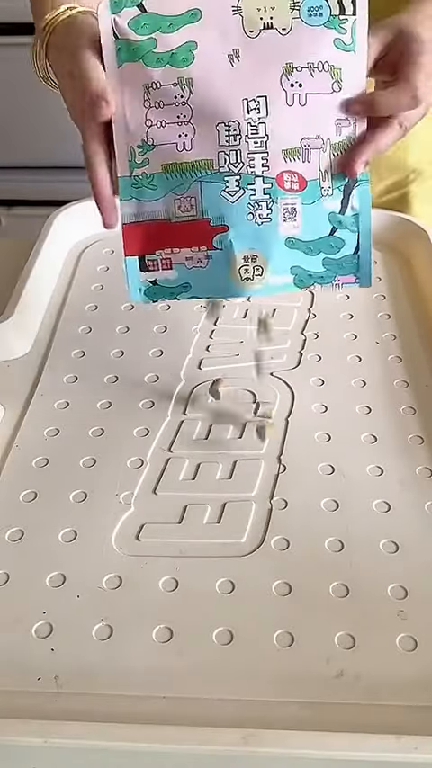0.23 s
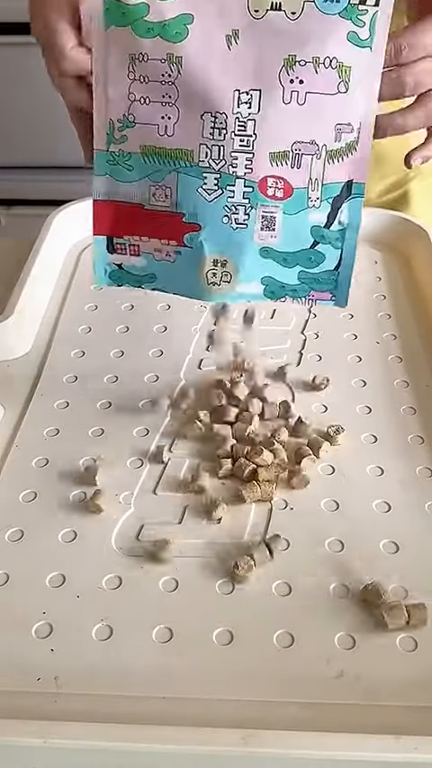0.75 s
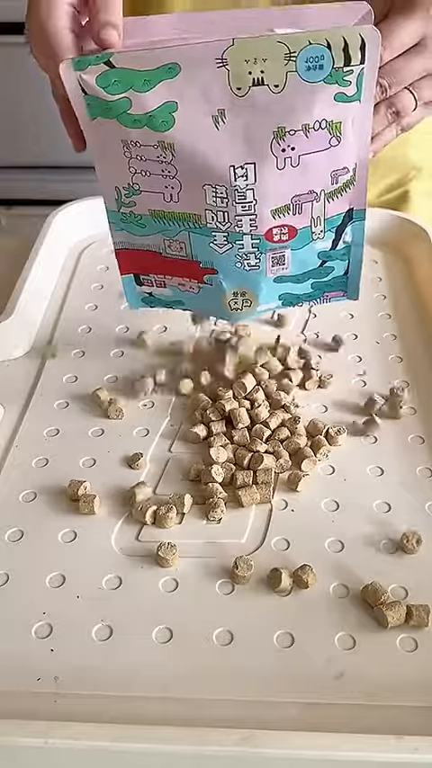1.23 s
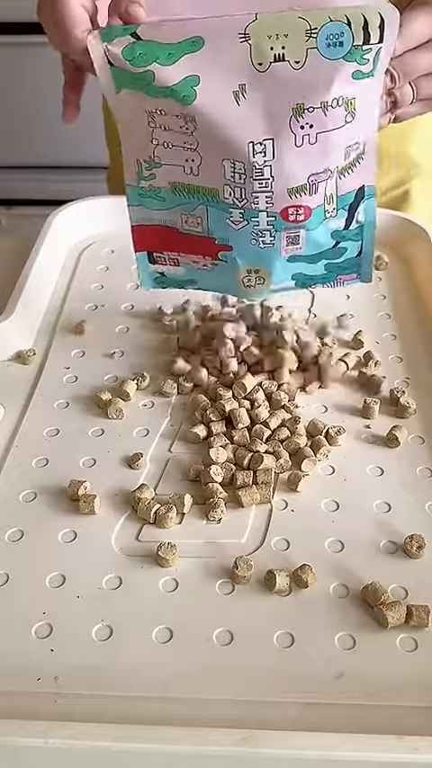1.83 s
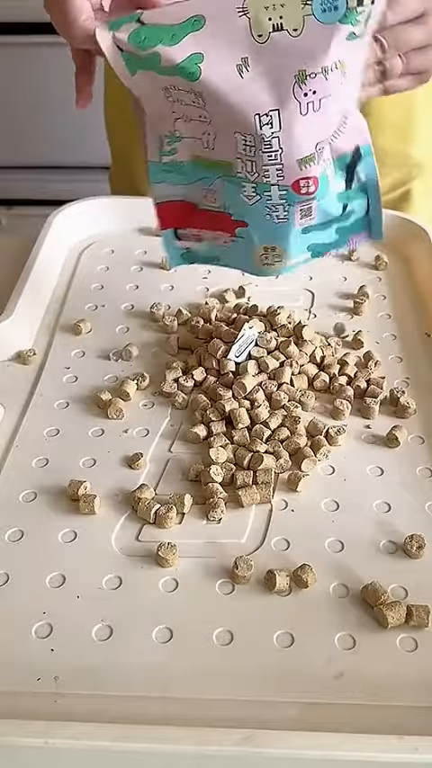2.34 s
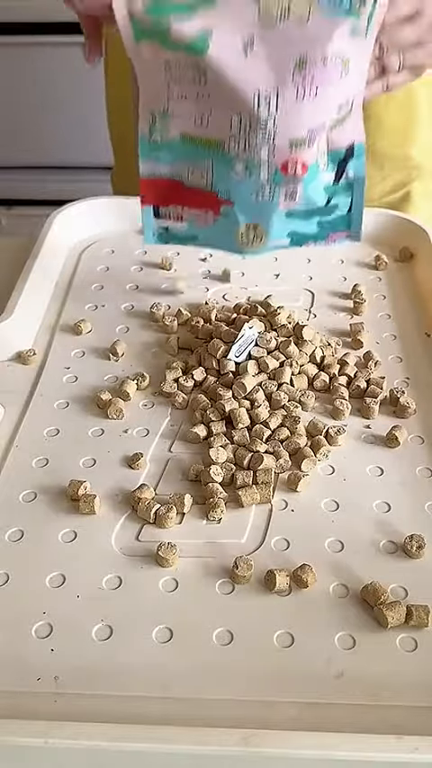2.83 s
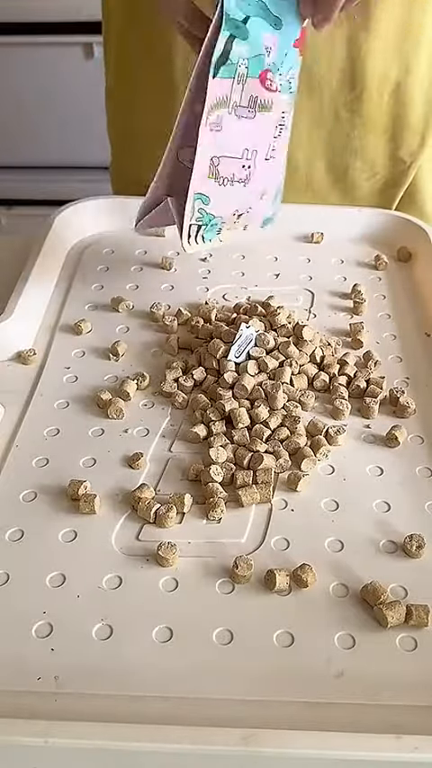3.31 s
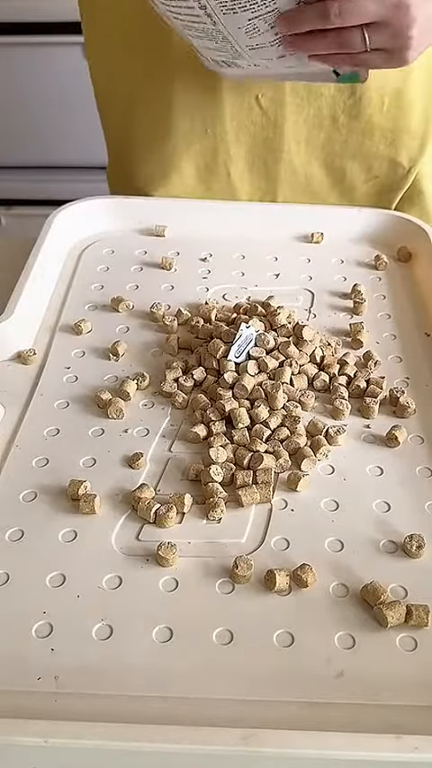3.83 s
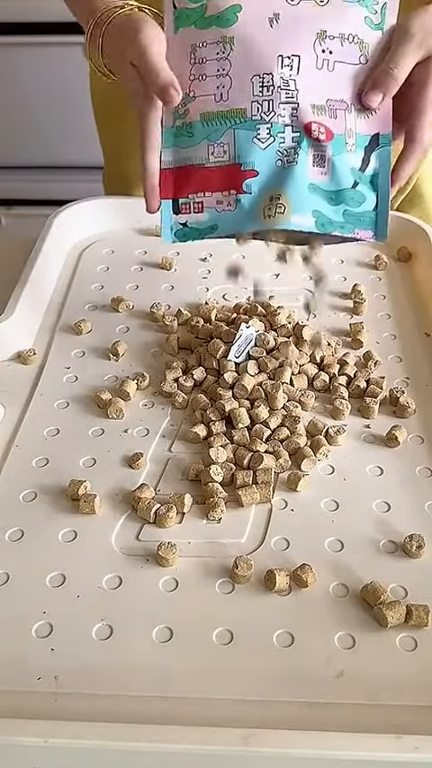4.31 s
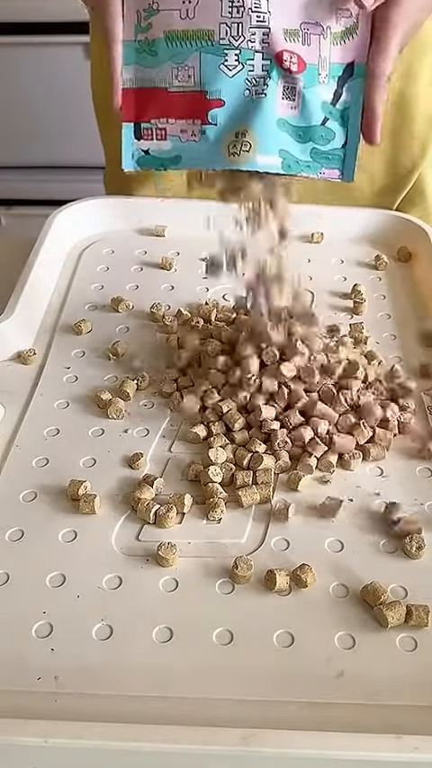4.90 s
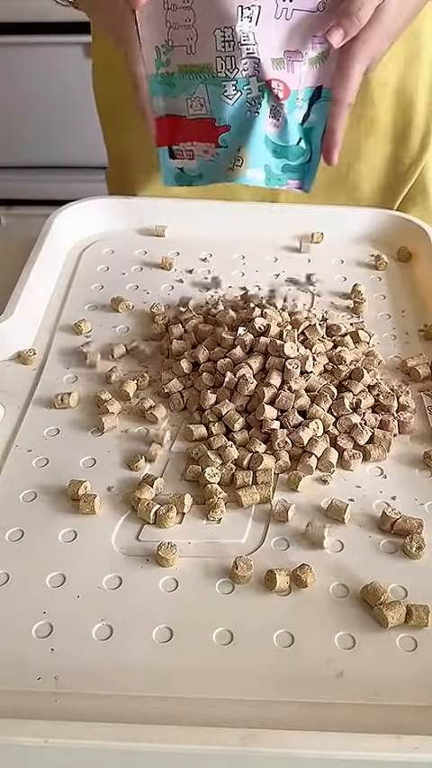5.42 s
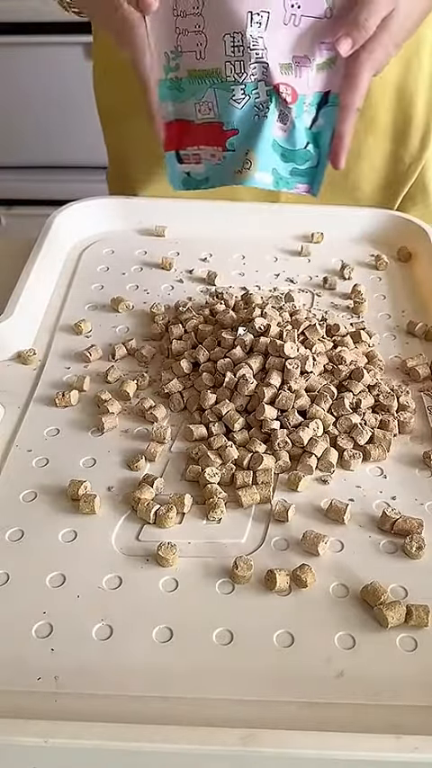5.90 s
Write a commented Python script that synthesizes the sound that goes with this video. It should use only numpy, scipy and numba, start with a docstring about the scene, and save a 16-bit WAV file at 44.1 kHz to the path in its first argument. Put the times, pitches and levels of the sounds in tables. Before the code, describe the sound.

Dry pellets clatter from a stiff plastic pouch onto a hollow plastic tray, with sharp film crackles, then a second pour and pouch shaking, close up indoors.

```python
"""Small hard room, indoors: dry pellets are shaken from stiff plastic pouches onto a hollow plastic tray, close by.
Hard landings are short pitched swings that push the tray's modes; random clicks patter on the heap.
Pouch film snaps in gritty bursts, rustles as filtered grains and thuds as its walls flex.
Decaying noise makes the room's answer; a faint rush and a low rumble are shaped noise.
Twice the sound drops briefly to near silence."""
import sys
import numpy as np
from scipy import signal
from scipy.fft import rfft, irfft
from scipy.io import wavfile
from scipy.ndimage import uniform_filter1d
from numba import njit

SR = 44100
rng = np.random.default_rng(int(sys.argv[2]) if len(sys.argv) > 2 else 0)


def int16_out(signal):
    """Quantize to a 16-bit WAV file."""
    q = np.round(np.clip(np.atleast_2d(signal).T, -1, 1) * 32767)
    wavfile.write(sys.argv[1], SR, q.astype(np.int16))


def ratio(d):
    """dB to gain"""
    e = np.asarray(d, float) / 20
    return 10 ** e


N = 271215
TIME = np.arange(N) / SR  # s

# All levels are relative, ahead of later gains.
# pellets landing hard: start_s [s], level_db [dB], pitch_hz [Hz]
LANDINGS = [(0.0132, -14, 1280), (0.0465, -6, 1500), (0.0516, -3, 1370), (0.0567, 1.5, 1207),
            (0.0817, -1, 1426), (0.0914, -1, 1300), (0.1076, -8.5, 1686), (0.1227, -12, 1390),
            (0.1863, -1.5, 1437), (0.1964, -9, 1450), (0.2201, -9.5, 1264), (0.2532, -2.5, 980),
            (0.2564, -7.5, 970), (0.2644, -10.5, 1040), (0.3118, -8, 852), (0.346, -5, 1400),
            (0.3526, -9.5, 1404), (0.3606, -2.5, 1224), (0.4073, -11, 1400), (0.4096, -3, 2900),
            (0.4156, -9.5, 1400), (0.431, -3, 1465), (0.5157, -3, 1297), (0.5205, -3.5, 1444),
            (0.531, -1, 1610), (0.5404, -10.5, 1740), (0.5552, -7.5, 1287), (0.5787, -2.5, 1303),
            (0.5914, -5.5, 880), (0.5955, 0, 1600), (0.716, -5, 1060), (0.723, -1, 1785),
            (0.902, -11, 1585), (0.996, -13, 1600), (1.2076, -8.5, 2150), (1.2195, -14, 2110),
            (1.284, -8, 1684), (1.42, -11, 1376), (1.4774, -11.5, 1790), (1.5692, 2, 1250),
            (1.6569, -16.5, 1070), (1.7622, -18.5, 1860), (1.8138, -8, 2380), (1.828, -12, 2750),
            (1.842, -11, 1870), (2.0658, -16, 1310), (2.3356, -18.5, 1720), (2.3891, -10, 1225),
            (2.4015, -10, 1320), (2.4577, -10, 1650), (2.4997, -16, 1460), (2.6698, -24.5, 1740),
            (2.913, -11, 480), (2.9698, -7, 1330), (2.9938, -11, 1174), (2.999, -8, 1390),
            (3.0118, 3, 2050), (3.0842, -7.5, 1680), (3.114, -16.5, 1150), (3.1237, 1.5, 1950),
            (3.146, -11, 1750), (3.209, -8, 970), (3.2773, -14, 1043), (3.3269, -6.5, 1230),
            (3.372, -3, 1600), (3.4096, -7, 1770), (3.4225, -7.5, 1410), (3.4294, -4, 1250),
            (3.5066, -3, 1755), (3.5236, -5.5, 1124), (3.5697, -9, 1114), (3.627, -12.5, 1280),
            (3.6411, -11.5, 1020), (3.6932, -1, 1290), (3.7042, 0, 1500), (3.7074, -3, 1200),
            (3.847, -10, 1930), (3.8569, -11, 736), (3.9362, -13, 676), (3.9791, -9.5, 2000),
            (4.0554, -10.5, 1850), (4.0802, -9, 764), (4.1286, -8, 850), (4.1457, -10.5, 1280),
            (4.221, -9.5, 870), (4.4143, -17, 980), (4.4792, -19.5, 956), (4.495, -16, 834),
            (4.5563, -9, 1130), (4.632, -12.5, 840), (4.6858, -15.5, 890), (5.1219, -19, 2115),
            (5.266, -23, 2000), (5.4281, -19, 1940), (5.531, -14, 1960), (5.5944, -15.5, 2380),
            (5.913, -13, 350), (5.9259, -5, 2070), (5.983, -15, 420), (5.996, -17, 1430),
            (6.038, -14.5, 1517), (6.0734, -8, 1395)]
# tray modes: mode_hz [Hz], gain_db [dB], t60_s [s]
TRAY_MODES = [(822, -5, 0.069), (1191, -9.5, 0.064), (1400, -4.5, 0.012), (1792, -0.5, 0.01),
              (2300, -5, 0.0097), (3200, 0, 0.006)]
# how freely the tray rings before the heap damps it: time_s [s], share [0-1]
TRAY_SHARE = [(.85, 0.53), (1.1, 0.28), (1.5, .35), (1.57, .65), (1.75, 0.35), (2.8, 0.15), (3.75, 0.15),
              (4.1, 0.35)]
# pouch creases snapping: start_s [s], level_db [dB], crease_body_vs_crisp_top_db [dB]
SNAPS = [(0.1227, -11, -2), (0.146, -30.5, -5.5), (0.1865, -24, 10), (0.2369, -27, 15.5),
         (0.2498, -22.5, 0.5), (0.381, -30, 8), (0.41, -24, 5), (0.5898, -18, 5.5), (0.6188, -18, -5),
         (0.8914, -26.5, 2), (0.9575, -27.5, -1), (0.9791, -28.5, 3.5), (1.1232, -12, -21.5),
         (1.1402, -17.5, -17), (1.2081, -20, 1.5), (1.2765, -16, -2), (1.2835, -17, -2), (1.433, -22, 2),
         (1.4775, -19.5, 3), (1.7245, -12, -15.5), (1.7367, -12.5, -20.5), (1.7588, -16.5, -3),
         (1.7885, -9, -4.5), (1.8135, -10, -12), (1.842, -17, -8.5), (1.8548, -8.5, -5), (2.0654, -18.5, 3),
         (2.331, -32.5, 5.5), (2.4043, -12, 1), (2.4231, -19, -17), (2.4596, -10.5, -7.5), (2.5014, -20, 5),
         (2.5075, -15, -8), (2.6719, -24.5, -3), (2.9228, -11, -7), (3.011, -20, 0), (3.321, -24.5, 2),
         (3.4181, -23.5, 1), (3.5709, -15, 0), (3.598, -19.5, 2), (3.7045, -28, 14), (3.9122, -30, 7.5),
         (4.0536, -21.5, 2.5), (4.0791, -11.5, -8), (4.1364, -26, 9.5), (4.2192, -7.5, -8.5),
         (4.2349, -20.5, 5.5), (4.2865, -7.5, -10.5), (4.3586, -10.5, -3), (4.412, -26.5, 9.5),
         (4.423, -8, -10), (4.477, -17.5, -0.5), (4.492, -9.5, -15), (4.555, -11, -1),
         (4.5669, -6.5, -10.5), (4.625, -10.5, -6), (4.6842, -20, 2), (4.698, -11, -17.5),
         (4.7979, -39.5, 13), (5.1211, -19.5, 0), (5.3679, -24, -9), (5.3752, -20.5, -5),
         (5.4163, -23.5, -4), (5.426, -10, -6.5), (5.5, -24, -6), (5.5237, -11, -6), (5.547, -11, -10.5),
         (5.5575, -10.5, -6), (5.5665, -18, -2), (5.58, -16, -3), (5.5875, -16, 4), (5.5941, -17, 6),
         (5.9112, -28, 5), (5.9262, -17, 4.5), (5.9925, -21, 0), (6.0345, -14, -7.5), (6.0405, -14, -20),
         (6.0719, -16, -23), (6.087, -15.5, -5)]
# film resonances, body: centre_hz [Hz], width_hz [Hz], gain_db [dB]
CREASE_BODY = [(2230, 760, 4.5), (3006, 1040, 3.5), (4040, 490, -5)]
# film resonances, top: centre_hz [Hz], width_hz [Hz], gain_db [dB]
CRISP_TOP = [(5640, 800, 0.41), (6270, 1560, -1.8), (7400, 2700, -7.3)]
# steady handling: time_s [s], pellet_flow_db [dB], pouch_grip_db [dB]
POURING = [(0, -20, -33), (0.26, -27, -29), (0.48, -29, -33), (0.7, -20, -29), (0.85, -28, -36),
           (0.934, -40, -36), (1.07, -40, -39), (1.33, -38, -36), (1.5, -48, -38), (1.96, -50, -47),
           (2.04, -45, -40), (2.15, -50, -52), (2.53, -68, -65), (2.77, -55, -47), (2.84, -28, -32),
           (3.036, -22, -35), (3.313, -21, -30), (3.479, -26, -38), (3.609, -21, -28), (3.802, -27, -43),
           (4.041, -31, -38), (4.195, -38, -38), (4.334, -52, -55), (4.78, -52, -47), (4.973, -57, -59),
           (5.13, -43, -44), (5.49, -50, -48), (5.77, -41, -47), (5.85, -60, -58), (6.15, -48, -41)]
# handfuls sliding out: peak_s [s], patter_db [dB], rise_20db_s [s], fade_20db_s [s]
SPILLS = [(.06, -14, .03, .17), (.11, -19, .02, .06), (.195, -18, .02, .1), (.255, -13, .06, .09),
          (.31, -20, .03, .07), (.36, -16, .04, .08), (.42, -18, .04, .09), (.525, -16, .02, .2),
          (.585, -17, .06, .1), (.715, -20, .1, .1), (.905, -25, .04, .08), (.985, -25, .06, .025),
          (1.195, -24, .06, .08), (1.42, -21, .17, .035), (1.5, -19, .05, .04), (1.578, -24, .01, .09),
          (2.975, -19, .1, .06), (3.0, -17, .04, .07), (3.33, -19, .2, .2), (3.42, -20, .05, .06),
          (3.61, -16, .05, .3), (3.861, -21, .04, .06), (3.927, -25, .06, .2)]
# jerks of the pouch: peak_s [s], strength_db [dB], rustle_vs_strength_db [dB], fade_20db_s [s]
JERKS = [(1.112, -33, 14, .04), (1.124, -28, 16, .04), (1.215, -30, -3, .08), (1.281, -24, -7, .045),
         (1.423, -26, -7, .035), (1.498, -24, -9, .033), (1.71, -47, 14, .2), (1.775, -31, 4, .1),
         (1.81, -25, 1, .15), (1.846, -22.5, 3, .065), (2.074, -24, 0, .055), (2.315, -35, -2, .15),
         (2.385, -27, 2, .06), (2.411, -20, 7, .03), (2.468, -23, -8, .035), (2.674, -46, -2, .3),
         (2.805, -36, 0, .1), (2.83, -29, 9, .14), (2.91, -21, -14, .15), (3.861, -28, -10, .06),
         (4.07, -30, 3, .12), (4.23, -28, 6, .08), (4.29, -31, 1, .025), (4.361, -26, -8, .03),
         (4.423, -31, 4, .035), (4.489, -23, 3, .025), (4.558, -24, 5, .028), (4.631, -27, 4, .035),
         (4.695, -30, 9, .05), (5.127, -38, -4, .1), (5.428, -31, -8, .08), (5.375, -33, -8, .05),
         (5.505, -32, -4, .1), (5.535, -26, 10, .1), (5.582, -25, 3, .2), (5.922, -20, -3, .05),
         (5.99, -27, -10, .06), (6.037, -22, 9, .05), (6.075, -30, 3, .1)]
# faint rush: time_s [s], level_db [dB]
RUSH_LEVEL = [(5.0, -80), (5.07, -44), (5.4, -54), (5.5, -81)]
# rumble spectrum: frequency_hz [Hz], level_db [dB]
RUMBLE_SPECTRUM = [(20, -11), (40, -5), (75, -6), (110, -8.5), (200, -15), (500, -31.5), (1100, -27.5),
                   (3000, -43.5), (7000, -48)]
# rumble level: time_s [s], level_db [dB]
RUMBLE_LEVEL = [(0, -40), (1.7, -40), (2.6, -44), (3.1, -42), (3.75, -35), (4.7, -41), (5.3, -36),
                (6.15, -41)]
# brief near-silences: stop_s [s], return_s [s]
GAPS = [(1.663, 1.692), (4.726, 4.760)]

JERK_RISE_20DB_S = 0.025
JERK_PATTER_DB = -4.5  # pellets shaken inside the pouch, against the jerk strength
GRIP_RUSTLE_DB, GRIP_FLEX_DB = -2.5, 2.5  # against the grip
ROOM_T60_S, ROOM_TREBLE_T60_S, ROOM_DB = 0.7, 0.44, -12
DUCK_THRESHOLD_DB, DUCK_FALL_20DB_S, DUCK_SLOPE = -6.5, 0.025, 0.4


def curve(rows):
    """Every column of a table joined by straight lines in time."""
    time_s, *columns = np.transpose(rows)
    return [np.interp(TIME, time_s, column) for column in columns]


def unit(x):
    """Scaled to rms 1."""
    return x / np.sqrt(np.mean(x ** 2))


def drift(rate_hz):
    """A slow random wander of rms 1: noise averaged twice over 1 / rate_hz."""
    k = int(SR / rate_hz)
    return unit(uniform_filter1d(uniform_filter1d(rng.standard_normal(N), k), k))


def band(x, hz, width_hz):
    """A resonance with gain 1 at its centre."""
    return signal.lfilter(*signal.iirpeak(min(hz, SR / 2.2), hz / width_hz, fs=SR), x)


def ring(x, resonances, stretch=1):
    """Sum of resonances, their centres multiplied by stretch."""
    return sum(ratio(db) * band(x, stretch * hz, width_hz) for hz, width_hz, db in resonances)


def grains(rate_hz, scatter_db):
    """Random clicks of either sign, mostly small, none huge."""
    hit = rng.random(N) < rate_hz / SR
    size = np.minimum(rng.exponential(size=N), 3)
    return hit * ratio(scatter_db * size) * rng.choice([-1., 1.], size=N)


def add(track, start_s, shape):
    """Mixes a short shape into a track."""
    i = int(start_s * SR)
    track[i:i + len(shape)] += shape[:N - i]


def swell_db(peak_s, db, rise_20db_s, fade_20db_s):
    """A level that climbs to its peak and fades again, both in straight dB lines."""
    return db - 20 * np.maximum((peak_s - TIME) / rise_20db_s, (TIME - peak_s) / fade_20db_s)


def handling():
    """Levels (dB) of patter, rustle and flexing: steady pour and grip, with the power of spills and jerks added."""
    flow_db, grip_db = curve(POURING)
    flow = ratio(2 * flow_db) + sum(ratio(2 * swell_db(*row)) for row in SPILLS)
    rustle = ratio(2 * (grip_db + GRIP_RUSTLE_DB))
    flex = ratio(2 * (grip_db + GRIP_FLEX_DB))
    power = np.array([flow, rustle, flex])
    for peak_s, db, rustle_db, fade_s in JERKS:
        shares = ratio(2 * np.array([[JERK_PATTER_DB], [rustle_db], [0]]))
        power = power + shares * ratio(2 * swell_db(peak_s, db, JERK_RISE_20DB_S, fade_s))
    return 10 * np.log10(power)


def landings():
    """Hard landings: a few cycles at each contact pitch, and a half-sine push on the tray."""
    contact, push = np.zeros(N), np.zeros(N)
    t = TIME[:900]
    for (start_s, db, hz), hiss in zip(LANDINGS, rng.standard_normal((len(LANDINGS), len(t)))):
        # grows for about a cycle, then dies in two or three
        cycles = hz * t / 0.92
        swing = np.sin(2 * np.pi * hz * t) * (cycles * np.exp(1 - cycles)) ** 2.4
        # jostled neighbours chatter for some ms
        jostle = band(hiss * t / 0.003 * np.exp(-t / 0.0026), 1.14 * hz, 0.65 * hz)
        # hard skins crack at first touch
        crack = band(hiss * np.exp(-t / 0.0011), 2.4 * hz, 1.6 * hz)
        add(contact, start_s, ratio(db) * (swing + ratio(-27) * unit(jostle) + ratio(-31) * unit(crack)))
        half_sine = np.sin(np.pi * np.minimum(hz * t, 1))
        add(push, start_s, ratio(db) * half_sine * hz / 1000)
    return contact, push


def heap_patter(patter_db):
    """Pellets of several sizes click on the heap, each size at its own pitch and in its own flurries."""
    sizes = [(600, 10), (820, 18), (1050, 21), (1300, 22),
             (1600, 20), (1950, 18), (2400, 13), (3300, 4)]  # pitch_hz, level_db
    heap = np.zeros(N)
    for hz, db in sizes:
        clicks = band(band(grains(350, 2.2), hz, 0.3 * hz), hz, 0.6 * hz)
        heap += ratio(db + 3.5 * drift(22)) * clicks
    return ratio(patter_db - 2) * unit(heap)


def tray(x):
    """The hollow tray: decaying modes as one-pole complex resonators."""
    out = np.zeros(N)
    for hz, db, t60_s in TRAY_MODES:
        pole = np.exp(2j * np.pi * hz / SR - np.log(1000) / (t60_s * SR))
        out += ratio(db) * signal.lfilter([1], [1, -pole], x).imag
    return out


def pellets(patter_db, tray_share):
    """Landings heard directly; patter is shared between the heap and the tray, which the landings also push."""
    contact, push = landings()
    patter = heap_patter(patter_db)
    return contact + (1 - tray_share) * patter + tray_share * tray(ratio(-28) * push + ratio(-28) * patter)


def film_snaps():
    """Each crease lets go as a gritty burst of about 3 ms through the film resonances."""
    snaps = np.zeros(N)
    t = TIME[:500]
    for (start_s, db, body_db), hiss in zip(SNAPS, rng.standard_normal((len(SNAPS), len(t)))):
        burst = unit(hiss * np.abs(hiss) * (t / 0.00072) ** 2 * np.exp(-t / 0.00072))
        # every crease has its own length, so its own pitch
        top = ring(burst, CRISP_TOP, 1.03 + 0.05 * hiss[0])
        body = ring(burst, CREASE_BODY, np.exp(0.15 * hiss[1]))
        add(snaps, start_s, ratio(db - 5) * (top + ratio(body_db) * body))
    return snaps


def film_rustle(rustle_db):
    """Sliding film: dense grains through the film resonances, the body wandering against the top."""
    fine = grains(2000, 1.5) * ratio(2.2 * drift(50))
    body = ratio(2.5 + 2.35 * drift(15)) * ring(fine, CREASE_BODY)
    return ratio(rustle_db - 3) * unit(ring(fine, CRISP_TOP) + body)


def wall_thud(flex_db):
    """Flexing pouch walls: sparser grains through low resonances."""
    modes = [(204, 210, -0.21), (367, 150, -1.7), (491, 150, -3.8)]  # centre_hz, width_hz, gain_db
    thud = band(ring(grains(450, 2.2), modes), 331, 440)
    return ratio(flex_db - 1) * unit(thud)


def pouch(rustle_db, flex_db):
    """Stiff pouch: creases snap, sliding film rustles, walls thud."""
    return film_snaps() + film_rustle(rustle_db) + wall_thud(flex_db)


def rush():
    """A faint rush near 1 kHz while the pouch is shaken empty: noise through two resonances."""
    noise = band(band(rng.standard_normal(N), 1110, 260), 1110, 260)
    return ratio(curve(RUSH_LEVEL)[0]) * unit(noise)


def walls(x):
    """Dense reflections that build over some ms; bass and treble die at their own rates."""
    t = TIME[:SR // 2]
    hiss = rng.standard_normal(len(t))
    low = signal.sosfilt(signal.butter(2, 1500, fs=SR, output="sos"), hiss)
    tail = low * ratio(-60 * t / ROOM_T60_S) + (hiss - low) * ratio(-60 * t / ROOM_TREBLE_T60_S)
    tail = tail * (1 - np.exp(-t / 0.008))
    return signal.fftconvolve(x, tail / np.sqrt(np.sum(tail ** 2)))[:N]


def rumble():
    """The building's low noise: spectrally coloured, swelling unevenly."""
    hz, db = np.transpose(RUMBLE_SPECTRUM)
    colour = ratio(np.interp(np.log(np.fft.rfftfreq(N, 1 / SR) + 1), np.log(hz), db))
    noise = unit(irfft(rfft(rng.standard_normal(N)) * colour, N))
    return noise * ratio(curve(RUMBLE_LEVEL)[0] + 1.5 * drift(7.4))


def scene():
    """Tray and pouch in the room, over rush and rumble."""
    patter_db, rustle_db, flex_db = handling()
    tray_share = np.clip(curve(TRAY_SHARE)[0], 0, 1)
    near = pellets(patter_db, tray_share) + pouch(rustle_db, flex_db)
    return (near + ratio(ROOM_DB) * walls(near) + rush() + rumble())[None]


@njit
def follow(x, fall):
    """Peak follower: jumps up at once, sinks by the factor fall per sample."""
    out, e = np.empty(len(x)), 0.
    for i in range(len(x)):
        e = max(abs(x[i]), e * fall)
        out[i] = e
    return out


def duck(x):
    """Soft limiter: gain falls as the smoothed peak passes the threshold and recovers after hard hits."""
    peak = follow(x[0], ratio(-20 / (DUCK_FALL_20DB_S * SR)))
    peak = uniform_filter1d(peak, size=88)  # 2 ms
    return x * np.minimum(ratio(DUCK_THRESHOLD_DB) / (peak + 1e-9), 1) ** DUCK_SLOPE


def gaps(x):
    """Brief near-silences: quick fade out, slower fade in, floor at 0.02."""
    for stop_s, return_s in GAPS:
        gate = np.maximum((stop_s - TIME) / 0.0023, (TIME - return_s) / 0.015)
        x = x * np.clip(gate, 0.02, 1)
    return x


def band_limit(x):
    """A steep low-pass at the top of the band."""
    return signal.sosfilt(signal.butter(12, 8870, fs=SR, output="sos"), x)


def record(dry):
    """A dull microphone (steep low-pass), ducking, rounded peaks and the brief gaps."""
    dull = signal.sosfilt(signal.butter(16, 7600, fs=SR, output="sos"), dry)
    rounded = 0.8 * np.tanh(duck(dull) / 0.77)
    mix = gaps(rounded)
    return band_limit(mix)


dry = scene()
out = record(dry)
int16_out(out)
```